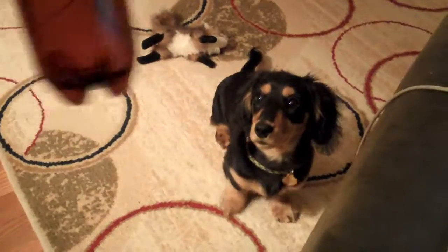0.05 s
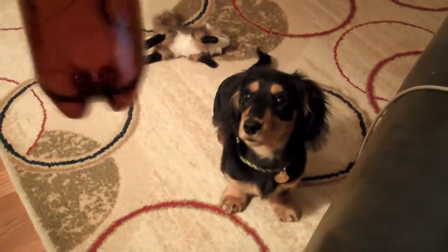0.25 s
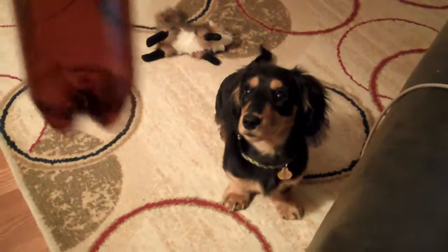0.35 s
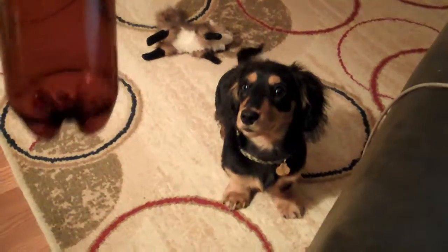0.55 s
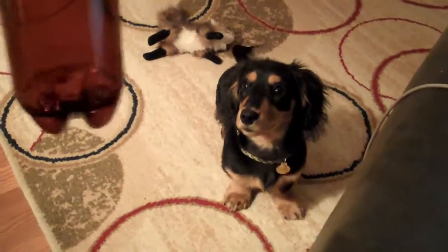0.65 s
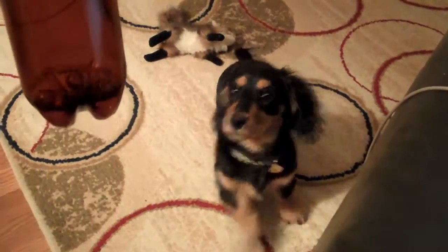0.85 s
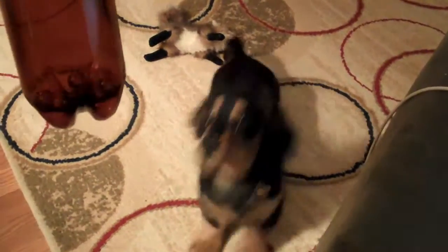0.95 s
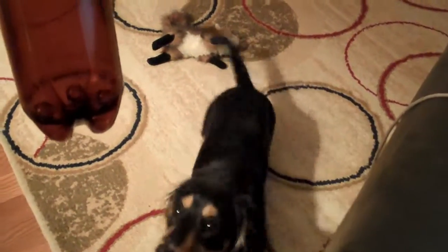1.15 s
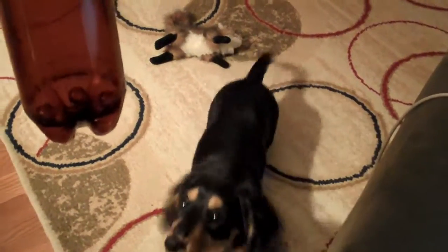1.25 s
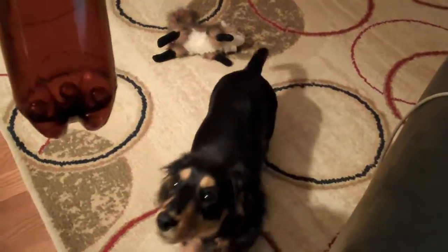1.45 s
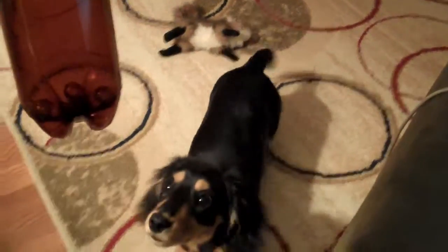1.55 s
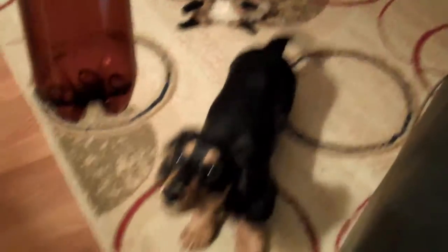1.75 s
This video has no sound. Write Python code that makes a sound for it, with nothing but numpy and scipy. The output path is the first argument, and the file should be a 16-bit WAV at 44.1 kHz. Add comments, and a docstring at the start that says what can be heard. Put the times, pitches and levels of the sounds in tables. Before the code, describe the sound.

A short, close rattle of glass marbles in a plastic bottle, dying away indoors.

```python
"""A few glass marbles rattle in a hand-held plastic bottle, close by in a carpeted room.
They thud and knock on the base, clack against the wall and tick against each other, then settle.
Each contact kicks the bottle's modes, with a crack and a crinkle of the thin wall; the air and shell
ring on briefly. Soft taps follow once the bottle is held still. Quiet room noise lies underneath."""
import sys
import numpy as np
from scipy import signal
from scipy.fft import rfft, irfft
from scipy.io import wavfile

SR = 44100
rng = np.random.default_rng(int(sys.argv[2]) if len(sys.argv) > 2 else 0)


def digitize_waveform(pressure):
    """Quantize a signal to 16-bit integers and store it at the path in sys.argv[1].

    Rows of a 2-D input are taken as channels; values are limited to [-1, 1].
    """
    field = np.atleast_2d(pressure).T
    bounded = np.clip(field, -1, 1)
    quanta = np.round(bounded * 32767).astype(np.int16)
    wavfile.write(sys.argv[1], SR, quanta)


N = 79380
THUD_TOP_HZ, KNOCK_TOP_HZ, CLACK_TOP_HZ = 883, 1770, 4120  # crossovers; the tick lies above
BOTTLE_PAN_DB, NOISE_PAN_DB = 3.5, 2.5  # left over right
WIDTH = 0.23  # stereo spread


def amp(db):
    """Decibels to gain."""
    return 10 ** (np.asarray(db) / 20)


def unit(x):
    """Scales a sound to unit energy, averaged over its channels."""
    return x / np.sqrt(np.mean(np.sum(x ** 2, -1)) + 1e-20)


def curve_at(points, hz):
    """Reads a curve on a log-frequency axis."""
    f, value = np.transpose(points)
    return np.interp(np.log(hz + 1), np.log(f + 1), value)


def fader(x, points):
    """Brings a full-length layer to unit RMS, then rides it along (time [s], level [dB]) points."""
    return unit(x) * np.sqrt(N) * amp(np.interp(np.arange(N) / SR, *np.transpose(points)))


def add(mix, start_s, sound):
    """Mixes a stereo sound in at a time."""
    part = mix[:, max(round(start_s * SR), 0):][:, :sound.shape[1]]
    part += sound[:, :part.shape[1]]


def pan(db):
    """Gains of left and right for a level difference."""
    return amp(np.array([[db], [-db]]) / 2)


def stereo_noise(size):
    """White noise, mostly shared by both ears."""
    mid, side = rng.standard_normal((2, size))
    return mid + WIDTH * np.array([side, -side])


def minimum_phase(points, size=1024):
    """Impulse response with a given spectrum and no pre-ring."""
    log_gain = np.log(amp(curve_at(points, abs(np.fft.fftfreq(size, 1 / SR)))))
    return np.fft.ifft(np.exp(np.conj(signal.hilbert(log_gain)))).real


def decay(t, t60):
    """Exponential fall by 60 dB in t60."""
    return np.exp(-np.log(1000) * t / t60)


def band(x, hz, kind, order=3):
    """Butterworth filter."""
    return signal.sosfilt(signal.butter(order, hz, kind, fs=SR, output="sos"), x)


def registers(x):
    """Splits a sound into lows, mids and highs."""
    return (band(x, KNOCK_TOP_HZ, "low", order=5),
            band(x, [KNOCK_TOP_HZ, CLACK_TOP_HZ], "band"),
            band(x, CLACK_TOP_HZ, "high", order=5))


def focus(x, hz, width_hz=260, blend_db=6):
    """Lifts the modes near one pitch by blending in a band-passed copy."""
    b, a = signal.iirpeak(hz, hz / width_hz, SR)
    return x + amp(blend_db) * signal.lfilter(b, a, x)


def rumble(level_db=-82, top_hz=70):
    """Faint, steady low rumble of the room."""
    lows = band(stereo_noise(N), top_hz, "low", order=2)
    return amp(level_db) * np.sqrt(N) * unit(lows) * pan(NOISE_PAN_DB)


def room_noise():
    """A bed of room tone that sinks under the rattle and slowly comes back."""
    # broad colour of the bed (frequency [Hz], relative density [dB])
    colour = [(15, -36), (25, -5), (108, -8), (344, -2), (1100, -5), (1600, -2), (3240, -5), (3810, -3.5),
              (13200, -33), (16000, -67.5)]
    # narrow peaks on top of it (centre [Hz], width [Hz], lift [dB])
    peaks = [(215, 25, 9.5), (340, 16, 5.5), (1550, 50, 6), (1740, 36, 6), (2040, 130, 4.5),
             (3730, 360, 3.5)]
    # likeness of left and right (frequency [Hz], correlation [0..1])
    likeness = [(60, .6), (290, 0.69), (640, 0.98), (1410, 0.7), (3100, 0.25), (6820, .13)]
    # level ride of the bed (time [s], level [dB])
    ride = [(0, -45.5), (.19, -46), (.28, -74), (0.999, -59), (1.2, -60.5), (1.389, -61), (1.48, -54.5),
            (1.62, -51.5), (1.8, -50.5)]
    hz = np.fft.rfftfreq(N, 1 / SR)
    left, other = rfft(rng.standard_normal((2, N)))
    same = curve_at(likeness, hz)
    right = same * left + np.sqrt(1 - same ** 2) * other
    peaks_db = sum(db / (1 + (2 * (hz - centre) / width) ** 2) for centre, width, db in peaks)
    bed = irfft(np.array([left, right]) * amp(curve_at(colour, hz) + peaks_db), N)
    return fader(bed, ride) * pan(NOISE_PAN_DB)


def room_reverb(x, frame=256, predelay_s=0.0025, crossfeed=0.43):
    """The carpeted room answers with a short, soft tail, different at each ear."""
    # decay of the room, capped below at 0.5 s (frequency [Hz], t60 [s])
    decay_times = [(150, 2.5), (1100, 0.44), (3200, .27), (7000, 0.4), (14000, 0.3)]
    # reverb send (frequency [Hz], level [dB])
    send = [(150, -14), (600, -11), (1150, -10), (1800, -6.5), (3200, -11.5), (6000, -17), (14000, -7.5)]
    noise = rng.standard_normal((2, SR // 2))
    fade_in = np.clip(np.arange(SR // 2) / SR / predelay_s - 1, 0, 1)
    reflections = (noise + crossfeed * noise[::-1]) * fade_in
    hz, t, spectra = signal.stft(reflections, SR, nperseg=frame)
    fall = decay(t, np.minimum(curve_at(decay_times, hz), .5)[:, None])
    fall *= amp(curve_at(send, hz))[:, None] / np.sqrt(np.mean(fall ** 2, 1, keepdims=True))
    tail = signal.istft(spectra * fall, SR, nperseg=frame)[1] / np.linalg.norm(reflections[0])
    return signal.fftconvolve(x, tail, axes=1)[:, :N]


def soft_taps(size=2048, t60_s=0.028, trim_db=1.0):
    """Light, dull touches once the bottle is held still, too weak to set it ringing."""
    # the touches (time [s], lows [dB], mids [dB], highs [dB])
    taps = [(0.9916, -27, -30, -34), (1.0135, -29, -32.5, -38), (1.028, -32, -33, -43),
            (1.052, -38, -42, -43), (1.104, -34.5, -42, -41), (1.204, -43, -35.5, -45.5),
            (1.286, -37, -43.5, -55.5), (1.293, -39, -47.5, -60), (1.332, -36.5, -38.5, -44.5),
            (1.377, -37.5, -48.5, -52.5), (1.569, -28.5, -30, -40)]
    # colour of a tap before its bands are balanced (frequency [Hz], relative density [dB])
    colour = [(60, -8), (250, -19), (720, 1.5), (1150, -4), (2200, -5.5), (3400, -2), (6000, -8),
              (12000, -21)]
    out, t = np.zeros((2, N)), np.arange(size) / SR
    for start_s, *levels_db in taps:
        burst = stereo_noise(size) * decay(t, t60_s)
        tap = signal.fftconvolve(burst, minimum_phase(colour)[None], axes=1)
        bands = [amp(db + trim_db) * unit(part) for db, part in zip(levels_db, registers(tap))]
        add(out, start_s, sum(bands))
    return out


def cavity_ring(x):
    """The bottle's air and shell keep ringing between the impacts."""
    # narrow resonances of air and shell (pitch [Hz], width [Hz], gain [dB])
    resonances = [(986, 60, -14), (1174, 14, -12), (1186, 24, -10), (1255, 34, -15.5), (1590, 22, -15.5),
                  (2984, 45, -8), (3520, 60, -18.5), (4600, 45, -11)]
    t = np.arange(SR // 2) / SR
    ring = np.zeros_like(t)
    for hz, width, db in resonances:
        envelope = amp(db) * 2 * np.pi * width / SR * np.exp(-np.pi * width * t)
        ring += envelope * np.cos(2 * np.pi * hz * t)
    return signal.fftconvolve(x, ring[None], axes=1)[:, :N]


def bottle_modes(t, spread_db=1.84, detune=.012, spread_rad=0.9):
    """All modes kicked together; the point of impact shifts their strength, pitch and phase."""
    # modes of the plastic bottle (pitch [Hz], relative level [dB], t60 [s])
    modes = [(228, -25, 0.0053), (463, -23, 0.011), (688, -11.5, 0.016), (765, -6, 0.017),
             (1133, 3.5, 0.028), (1220, -2, 0.027), (1597, -5, 0.02), (2228, -1, .012), (3086, -2.5, .014),
             (3734, -1.5, .012), (4638, -5, 0.013), (5542, -4, .01), (6180, -6.5, .008),
             (6820, -6.5, 0.011), (8000, -18.5, 0.002), (8900, -20, .005)]
    hz, db, t60 = np.transpose(modes)[:, :, None]
    strength, tuning, shift, skew = rng.standard_normal((4, len(hz), 1))
    phase = 2 * np.pi * hz * (1 + detune * tuning) * t + spread_rad * shift
    envelope = amp(db + spread_db * strength) * decay(t, t60)
    ear_phase = WIDTH * skew * hz / CLACK_TOP_HZ  # higher modes sound wider
    return unit(np.array([(envelope * np.cos(phase + side * ear_phase)).sum(0) for side in (-1, 1)]))


def crack_and_crinkle(t, crack_db=-3.5, crinkle_db=-11, crinkle_rise_s=0.0024):
    """The contact cracks, and the thin wall crinkles just after."""
    # colour of both (frequency [Hz], relative density [dB])
    colour = [(40, -15.5), (150, -22.5), (400, -9.5), (900, 6.5), (1800, -4), (3200, 0), (5500, -2),
              (7500, -10.5), (10000, -15.5), (13000, -26), (16000, -37)]
    noise = stereo_noise(len(t))
    crack = noise * decay(t, t60=.002)
    crinkle = noise * decay(t, t60=.022) * (1 - np.exp(-t / crinkle_rise_s))
    burst = amp(crack_db) * unit(crack) + amp(crinkle_db) * unit(crinkle)
    return signal.fftconvolve(burst, unit(minimum_phase(colour))[None], axes=1)[:, :len(t)]


def impact(size=2048, attack_s=.00018):
    """One marble contact: ringing body plus noisy transient, with random polarity."""
    t = np.arange(size) / SR
    attack = 1 - np.exp(-t / attack_s)
    return (bottle_modes(t) + crack_and_crinkle(t)) * attack * rng.choice([-1, 1])


def marbles_rolling(voices=12, contacts_per_s=230, low_cut_hz=1120):
    """Many tiny contacts as the marbles roll and jostle over the ribs of the base."""
    # swells of the rolling (time [s], level [dB])
    ride = [(.17, -66), (0.204, -31.5), (.232, -25.5), (.25, -58), (.285, -23.5), (.31, -41), (.345, -54),
            (0.408, -32), (.52, -45.5), (.62, -41), (.68, -53), (.8, -47), (.89, -48.5), (.95, -69),
            (1.1, -88)]
    out = np.zeros((2, N))
    for _ in range(voices):
        contacts = (rng.random(N) < contacts_per_s / voices / SR) * rng.uniform(.3, 1, N)
        out += signal.oaconvolve(contacts[None], impact(), axes=1)[:, :N]
    return fader(band(out, low_cut_hz, "high", order=2), ride)  # tiny contacts hardly move the base


def marble_hits(thud_trim_db=-1.5, knock_trim_db=-1, clack_trim_db=-1.5, tick_trim_db=1.0):
    """Each hit has its own blend of base thud, hollow knock, wall clack and glassy tick."""
    # marble impacts
    # (time [s], thud [dB], knock [dB], clack [dB], tick [dB], clack pitch [Hz], tick pitch [Hz])
    hits = [(0.1027, -21, -27, -10.5, -12, 2550, 4800), (0.165, -20.5, -20, -25, -41, 2480, 4460),
            (0.1903, -10, -9, -8, -8.5, 2810, 4860), (0.1983, -9.5, -5, -0.5, -5, 3240, 4630),
            (0.201, -4, -2.5, -2, -0.5, 3860, 4760), (0.206, 0.5, 11.5, 4.5, -2, 2950, 5000),
            (0.2105, -12, -3, -7, -16, 3180, 4940), (0.2141, -3, 2.5, -9, -11, 2900, 5680),
            (0.2173, -11, -3.5, 2, -7, 2720, 4950), (0.2283, -26.5, -15, -2, -6, 2820, 4700),
            (0.231, -16.5, -10.5, -22, 1, 2790, 4940), (0.2531, -25, -11, 5.5, 4, 2290, 4740),
            (0.2643, -5.5, 8, 12, 9, 3200, 4920), (0.2681, -20, -10, 0, 2.5, 3150, 4650),
            (0.2717, -8, -3, 9.5, -8, 3340, 4370), (0.2749, -12, 1.5, 9, 7, 3460, 5420),
            (0.2851, -10, -24, 7, 3, 3780, 4910), (0.287, -22, 1, 4, -7, 3520, 4400),
            (0.2923, -24.5, -13, 3, -3, 3730, 4600), (0.2989, -16, -4.5, 5, -1, 3600, 4730),
            (0.3043, -25.5, -7.5, -6, -10, 3640, 4500), (0.3082, -19, -16, -4, -8, 3230, 4430),
            (0.3532, -11.5, -5, 3.5, 2, 3040, 5380), (0.3611, -14.5, -3.5, 1.5, -0.5, 3200, 5050),
            (0.3641, -2.5, 10.5, 10, 3, 2306, 4330), (0.3889, -7.5, -1, -30, -6, 2900, 5050),
            (0.392, -29.5, -13, 2, 0, 2200, 5300), (0.401, -1.5, 5.5, 0, 3, 3880, 5000),
            (0.4051, -20.5, -13.5, -4, -16, 2163, 4670), (0.4083, -7, 6, 4, 0.5, 2480, 4890),
            (0.4148, -28.5, -20, 1.5, -8, 2100, 5140), (0.4203, -12, 0, 3, -6, 3340, 4570),
            (0.422, -6.5, -14, -13, -2.5, 3640, 4860), (0.4294, -13, -11.5, -2.5, -11, 2870, 4860),
            (0.4338, -13.5, -8, -8, -5, 3540, 4800), (0.4424, -27, -11, -1, -8, 2930, 5700),
            (0.4487, -15, -23, -20, -11.5, 2940, 5140), (0.4603, -1.5, 3.5, -24, -5, 2470, 5800),
            (0.469, -5.5, 11.5, -2.5, 2, 2960, 4120), (0.4761, -14, -14.5, -2.5, -7, 2500, 5130),
            (0.4806, -17, -4, -3, -6.5, 3500, 5840), (0.4944, -8.5, -3, -3, -4, 3650, 5060),
            (0.505, -11.5, -8, 1, 0.5, 3050, 5140), (0.5348, -8, -10, -17, -6, 2720, 4800),
            (0.5462, -5.5, -9.5, -0.5, -8.5, 3380, 4560), (0.5647, -1, 3, -0.5, -1.5, 3700, 5770),
            (0.575, -12, -15, -20, -18, 3110, 5240), (0.5864, -13.5, -6.5, -11, -9, 3570, 4620),
            (0.595, -23, -19.5, -13, -13, 3200, 5300), (0.5984, -19.5, -1, 3, -3, 3110, 4540),
            (0.6082, -6.5, 0, 4, 1, 3280, 5040), (0.6423, -34.5, -17, 8.5, -2.5, 3410, 5230),
            (0.6896, -18.5, -6.5, -7, -13, 3040, 4640), (0.7024, -22.5, -6.5, -2.5, -9.5, 2700, 4830),
            (0.7178, -19, -7, -21, -15, 2750, 4670), (0.7358, -10.5, 2.5, -4, -11.5, 3150, 5900),
            (0.7407, -22, -16, -21, -15, 3550, 4200), (0.754, -8.5, -8, -22, -11, 2660, 6100),
            (0.7848, -21.5, -8.5, -5, -9, 3380, 5200), (0.8347, -20.5, -7.5, -10.5, -11.5, 2940, 4330),
            (0.841, -24.5, -25, -14, -15, 2440, 5110), (0.8524, -31.5, -21, -16, -40, 3100, 5000),
            (0.8632, -30, -18.5, -22, -38, 2490, 4500), (0.8767, -36, -20.5, -18, -17.5, 2440, 5140),
            (0.894, -19.5, -17, -21, -26.5, 2780, 5230)]
    hardness, sparkle_hz = .12, 9500  # harder ticks are brighter
    out = np.zeros((2, N))
    for start_s, thud_db, knock_db, clack_db, tick_db, clack_hz, tick_hz in hits:
        lows, mids, highs = registers(impact())
        sparkle = amp(hardness * tick_db) * band(highs, sparkle_hz, "high", order=1)
        thud = amp(thud_db + thud_trim_db) * unit(band(lows, THUD_TOP_HZ, "low", order=5))
        knock = amp(knock_db + knock_trim_db) * unit(band(lows, THUD_TOP_HZ, "high", order=4))
        clack = amp(clack_db + clack_trim_db) * unit(focus(mids, clack_hz))
        tick = amp(tick_db + tick_trim_db) * unit(focus(highs + sparkle, tick_hz))
        add(out, start_s, thud + knock + clack + tick)
    return out


def scene(low_cut_hz=60, right_delay_s=.000034):
    """The bottle, close and a little to the left, over the room's tail and noise."""
    rattle = band(marble_hits() + marbles_rolling(), low_cut_hz, "high", order=1)
    left, right = rattle + cavity_ring(rattle) + soft_taps()
    delay = np.exp(-2j * np.pi * np.fft.rfftfreq(N, 1 / SR) * right_delay_s)
    right = irfft(rfft(right) * delay, N)
    bottle = np.array([left, right]) * pan(BOTTLE_PAN_DB)
    return bottle + room_reverb(bottle) + room_noise() + rumble()


def record(dry, cutoff_hz=15900):
    """Peaks clip at full scale, then a steep low-pass trims the very top."""
    lowpass = signal.firwin(511, cutoff_hz, window=("kaiser", 8), fs=SR)
    return signal.oaconvolve(np.clip(dry, -1, 1), lowpass[None], "same")


dry = scene()
out = record(dry)
digitize_waveform(out)
```